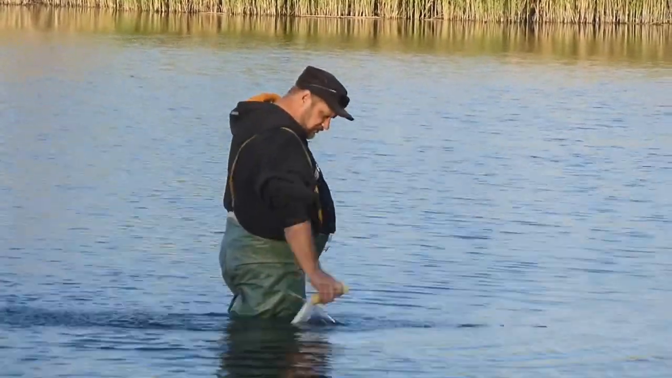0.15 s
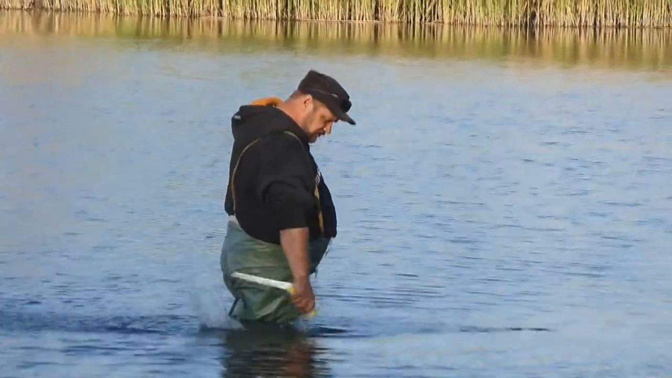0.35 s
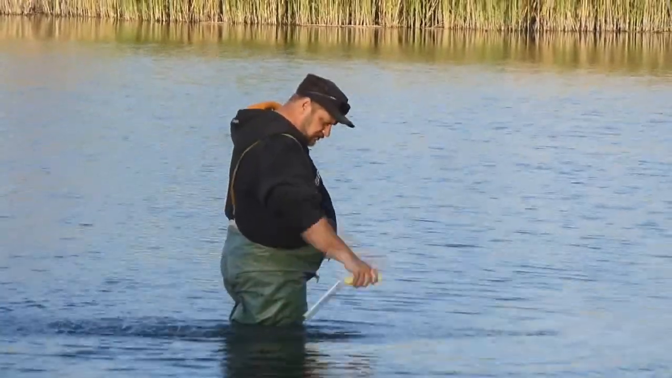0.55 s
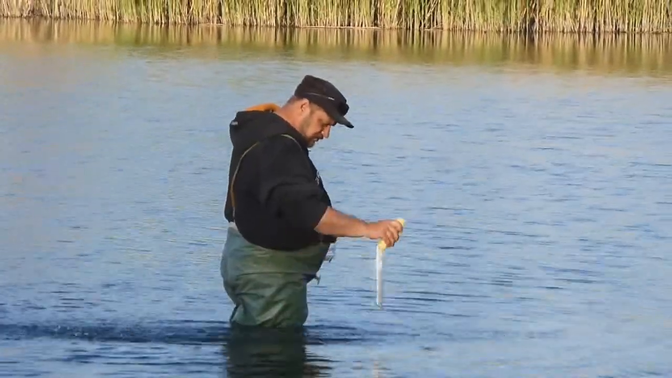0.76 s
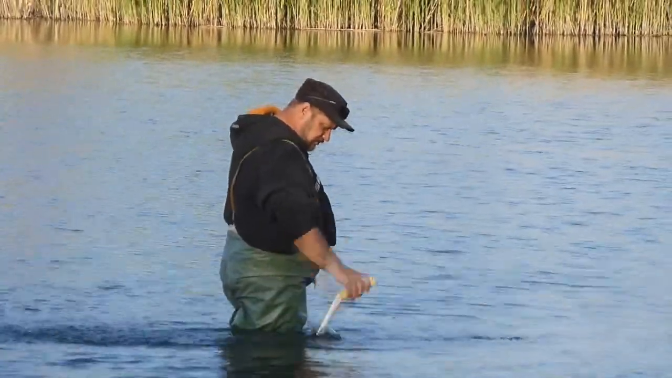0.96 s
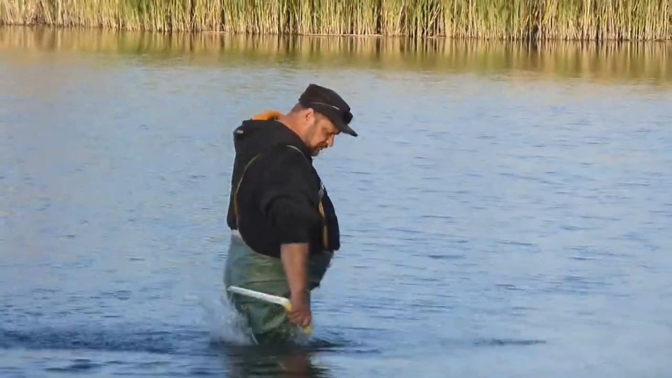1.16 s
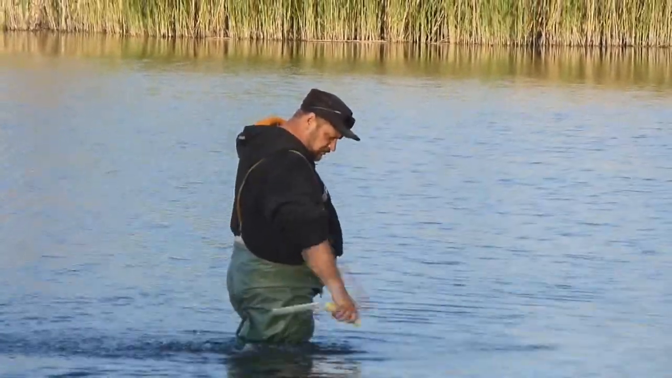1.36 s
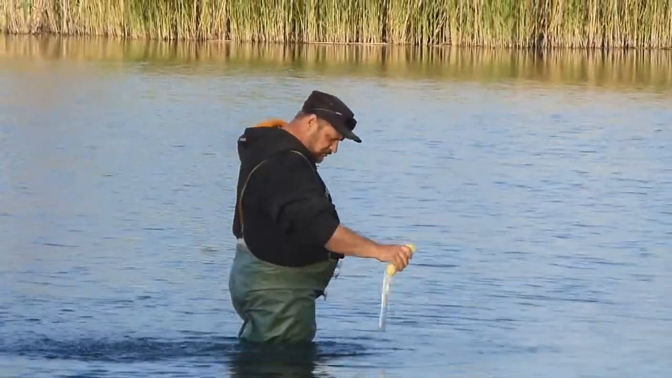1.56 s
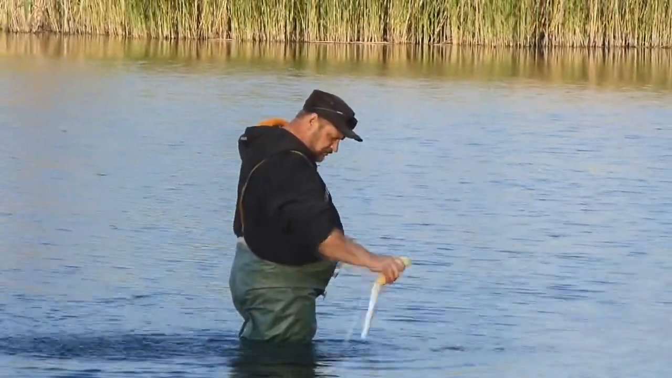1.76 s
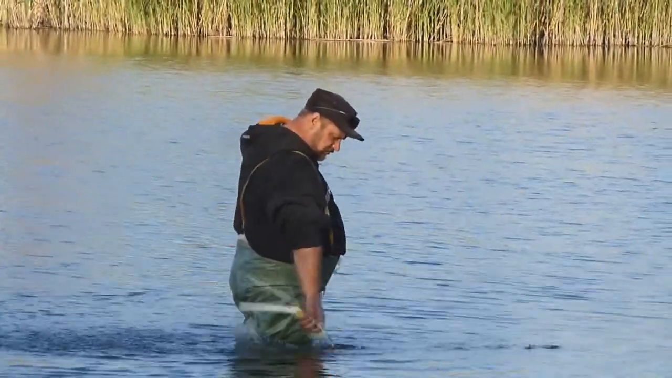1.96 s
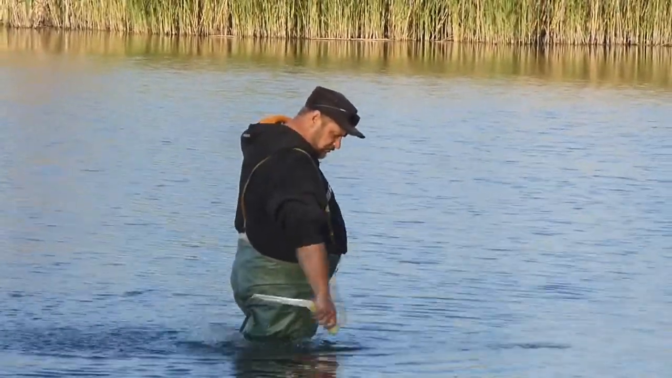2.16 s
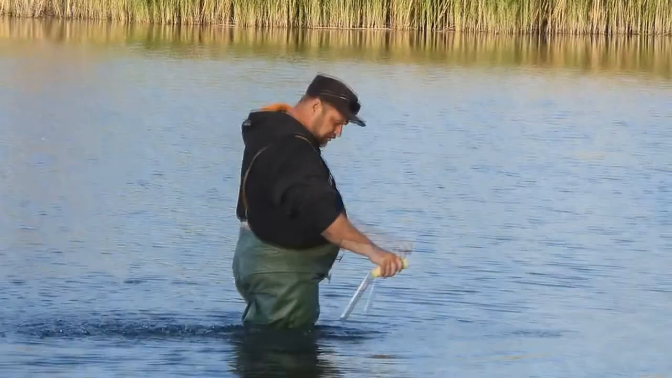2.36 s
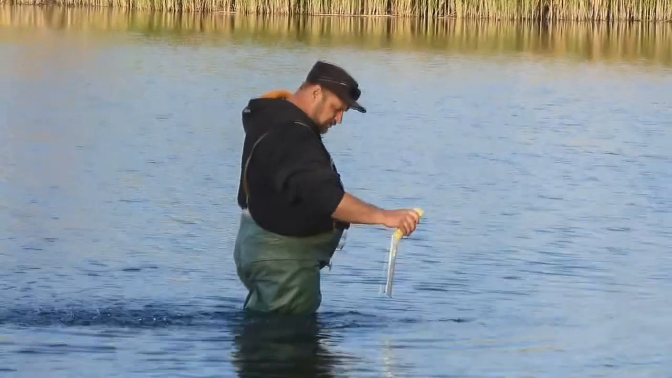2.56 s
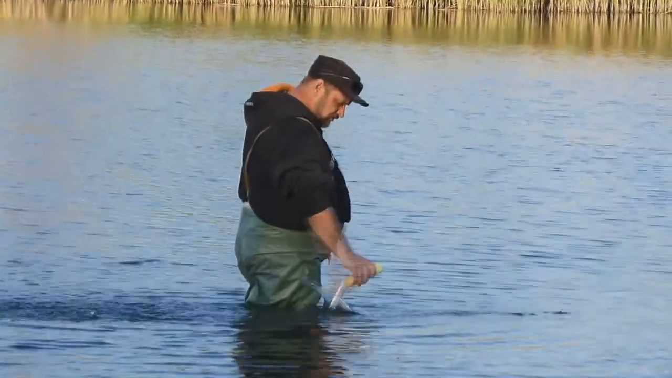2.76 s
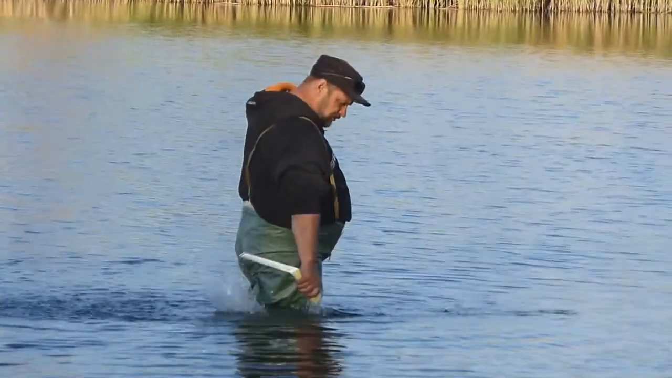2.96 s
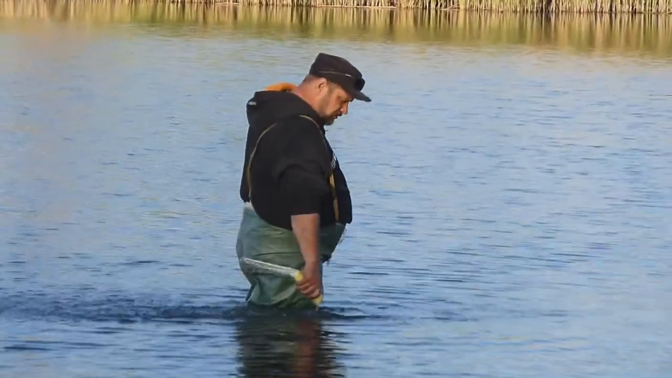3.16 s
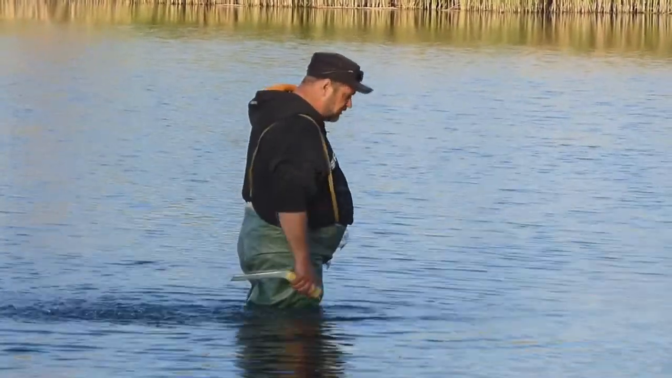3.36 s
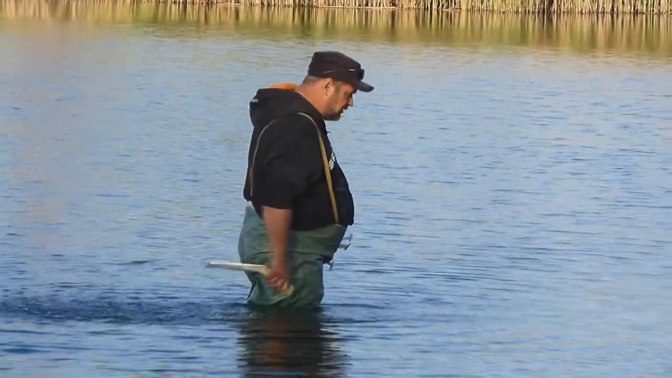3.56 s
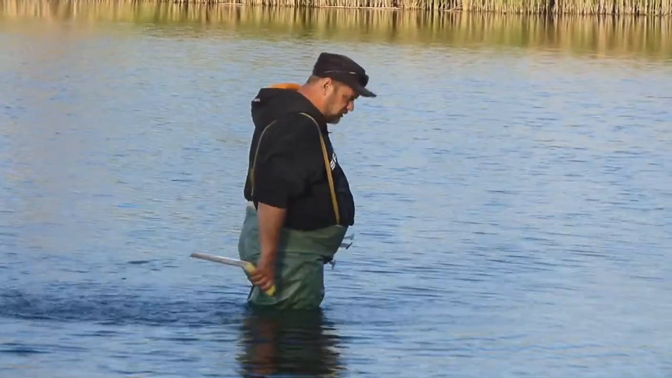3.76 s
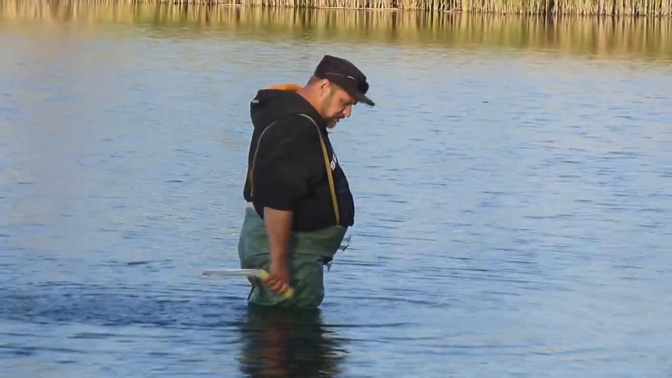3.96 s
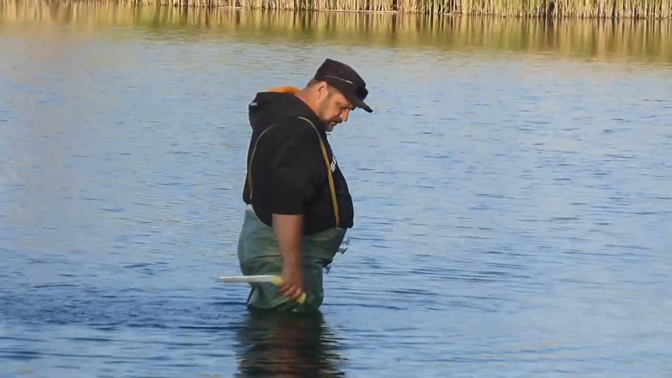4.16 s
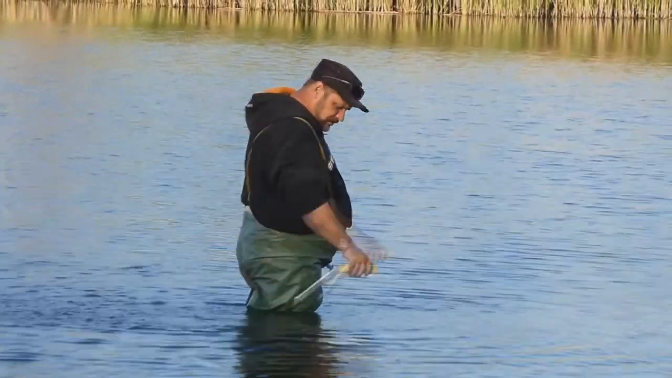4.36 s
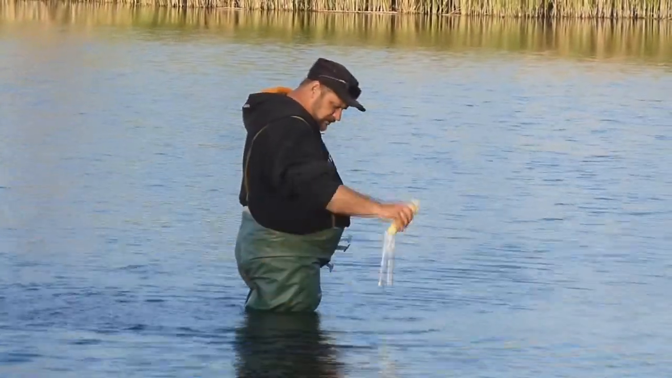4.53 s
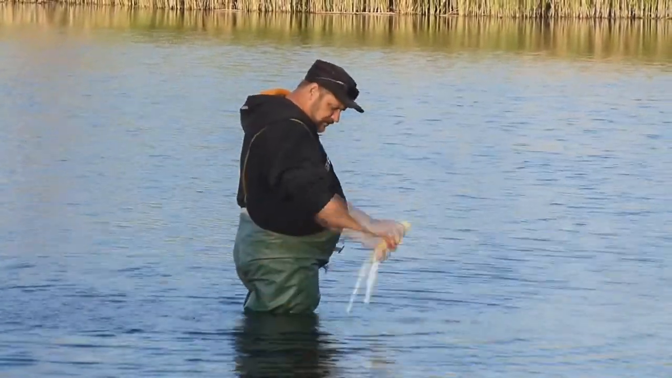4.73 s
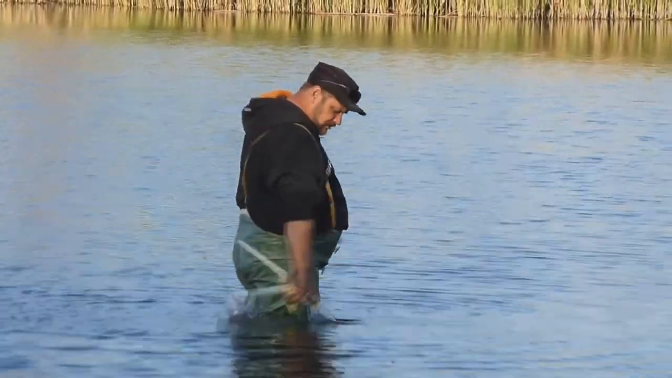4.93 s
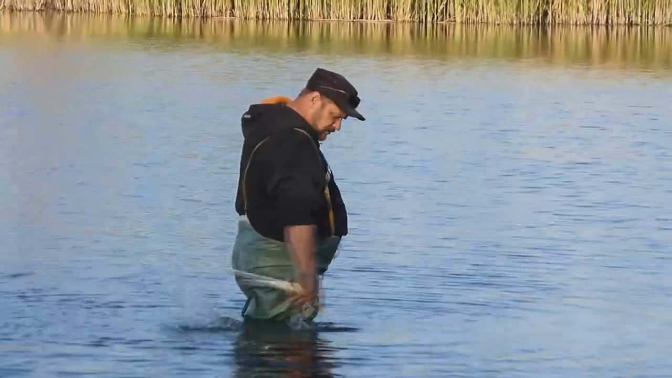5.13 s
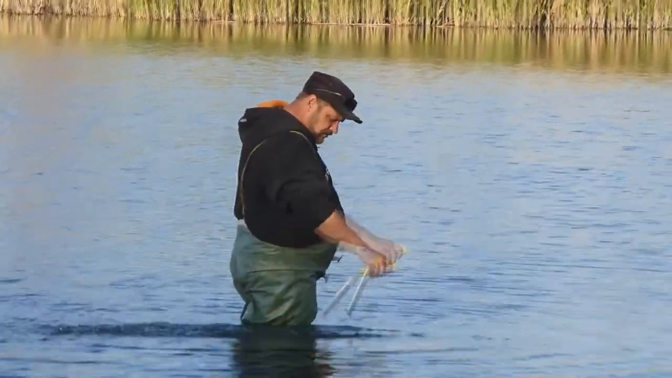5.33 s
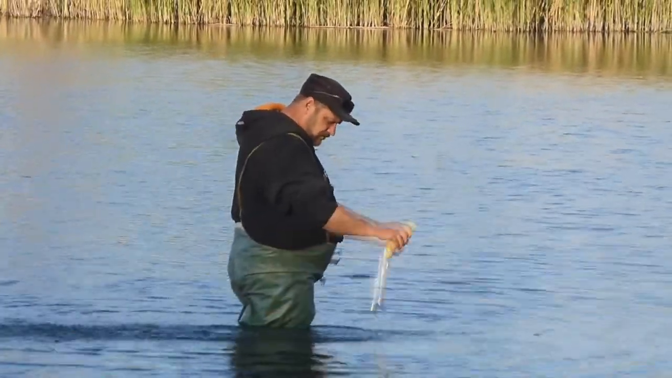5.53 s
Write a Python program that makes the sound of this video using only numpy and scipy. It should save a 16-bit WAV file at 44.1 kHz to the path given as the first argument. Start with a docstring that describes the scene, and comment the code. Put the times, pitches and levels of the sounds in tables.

```python
"""A slap and a low, rising plop break in on faint birdsong: an angler strikes a lake five times with a
wooden clonk. Each stroke drags down an air pocket, which pinches off, throws a little spray and rings
as a bubble resonator, higher as it nears the surface. The reed bank scatters back a faint echo.
Distant birds whistle, trill and yelp over soft air and ripples, and one gust touches the microphone."""
import sys
import numpy as np
from scipy import signal
from scipy.fft import rfft, irfft, next_fast_len
from scipy.io import wavfile
from scipy.ndimage import map_coordinates

SR = 44100
rng = np.random.default_rng(int(sys.argv[2]) if len(sys.argv) > 2 else 0)


def transcribe(signal):
    """Save signal, clipped to [-1, 1], as a 16-bit WAV file at the path in sys.argv[1]."""
    frames = np.atleast_2d(signal).T
    limited = np.clip(frames, -1, 1)
    pcm = np.round(limited * 32767).astype(np.int16)
    wavfile.write(sys.argv[1], SR, pcm)


N = 250929
TIME = np.arange(N) / SR

# strokes of the clonk: pinch-off t/s, time under water before it/s, plop level/dB, first f/Hz,
# last f/Hz, rise time/s, ring re plop/dB, slap level/dB, burst level/dB, spray level/dB, wood level/dB
STROKES = [(0.3170, 0.021, -5.5, 241, 447, 0.0069, -11.5, -30, -33.5, -40, -32),
           (1.1700, 0.011, -3, 223.5, 451, .01, -8, -31, -36, -47.5, -26.5),
           (2.0660, .0201, -6, 221, 420, 0.0081, -9, -33, -38, -41, -30.5),
           (2.944, .0091, -3, 220, 410, .0104, -7, -29, -39, -45.5, -28.5),
           (5.0333, .0215, -3.2, 237, 414, 0.0082, -14.5, -32, -33.3, -44.5, -34)]
# spectra of the surface slap, the closing cavity and the spray: f/Hz, relative level/dB
SLAP_SPECTRUM = [(150, 13), (600, 0), (1200, -4), (2800, -3), (4300, -11), (6000, -24.5), (10000, -31),
                 (15500, -48)]
BURST_SPECTRUM = [(100, -25), (400, -6), (650, 0), (1000, 0), (1600, -2), (3100, -1), (4200, -7),
                  (5500, -14), (9000, -18), (15500, -25)]
SPRAY_SPECTRUM = [(300, -29), (700, -1.5), (1500, 0.5), (3500, -6), (6000, -11), (10000, -21.5),
                  (15500, -32)]
# the clonk's modes, damped by hand and water: f/Hz, relative level/dB, T60/s
WOOD_MODES = [(645, 3, .055), (1020, 3, .035), (1530, -4, .04)]
# air tearing into the pocket: t/s, level/dB
AIR_TEARS = [(0.314, -39), (2.0630, -20)]
# falling drops that trap a bubble: t/s, level/dB, f/Hz
BUBBLE_DROPS = [(0.408, -39, 577), (0.474, -40, 1080), (0.520, -40.5, 1110), (1.208, -34, 556),
                (2.232, -38, 690), (2.243, -39.5, 1020), (2.986, -38, 1110)]
# droplets ticking on the surface: t/s, level/dB
DROPLET_TICKS = [(0.118, -39), (0.812, -39), (0.896, -40), (1.4144, -43), (2.8094, -45), (3.2614, -47),
                 (3.2842, -48), (5.182, -44)]

# slurred whistles: t/s, duration/s, start f/Hz, end f/Hz, level/dB, rasp (0-1)
SLURS = [(-0.03, 0.065, 3750, 3100, -52, .12), (0.782, .12, 2500, 3080, -49, .5),
         (2.498, 0.15, 3400, 4200, -61, .22), (2.616, .091, 4290, 4640, -54, 0.34),
         (3.82, .052, 2790, 3600, -56.5, .3), (4.21, .12, 3620, 3900, -62.5, .15),
         (4.575, .07, 2770, 2850, -53, 0.3), (4.834, 0.16, 2585, 2510, -55, .4),
         (5.07, 0.24, 1860, 1530, -63, .3), (5.341, 0.06, 2200, 1790, -47.5, .35),
         (5.598, 0.064, 2400, 2260, -45.5, 0.2), (5.641, .06, 2320, 1660, -48.5, .3)]
# whistles that rise and fall back: t/s, duration/s, top f/Hz, level/dB
ARCHES = [(0.286, .205, 4380, -58.5), (0.328, .13, 3100, -59), (4.3, .14, 4230, -58.5)]
# quick upward flicks: t/s, level/dB, rasp (0-1)
FLICKS = [(0.533, -56, .7), (4.085, -56.5, 0.88), (4.355, -58, .1), (4.415, -60, .1), (4.94, -61, 1)]
# hoarse notes on one pitch: t/s, duration/s, f/Hz, level/dB
HOARSE_NOTES = [(-0.02, 0.13, 4500, -55), (0.135, 0.18, 2080, -55), (0.627, .05, 4500, -57.5),
                (0.826, .07, 1690, -58.5), (0.878, .052, 2650, -52.5), (1.105, 0.049, 4800, -57.5),
                (1.38, 0.3, 2760, -59.5), (1.436, .19, 2080, -62), (2.62, .09, 2620, -58),
                (2.821, 0.084, 2520, -50.5), (2.95, 0.15, 6450, -62), (4.779, .06, 1994, -56)]
# trills: t/s, duration/s, centre f/Hz, swing/Hz, beat rate/Hz, throb/dB, level/dB, rasp (0-1)
TRILLS = [(5.12, 0.2, 2900, 396, 43, 9, -60, 0.51), (5.394, .15, 1990, 316, 41, 3.5, -52.5, 0.38)]
# held calls: t/s, duration/s, level/dB
HELD_CALLS = [(3.464, 0.081, -49.5), (3.635, .13, -51), (3.53, 0.51, -63.5)]
# double yelps: t/s, level/dB
YELPS = [(3.970, -47), (4.116, -48), (4.291, -47), (4.447, -47)]
# course of one long falling whistle: t/s, f/Hz, level/dB
FALLING_WHISTLE = [(2.72, 8420, -76), (2.81, 8170, -49.5), (2.83, 7320, -48), (2.875, 7090, -49),
                   (2.91, 5880, -52), (2.95, 5070, -56), (3.02, 4540, -55), (3.12, 4220, -62),
                   (3.28, 3200, -51.5)]
# swells of the far chorus: peak t/s, half width/s, level/dB
CHORUS_SWELLS = [(0.1, .3, -58), (0.68, .23, -56.5), (2.32, .18, -56.5), (3.2, .14, -60.5),
                 (5.25, .8, -60.5)]

# reverberation time of the reed bank: f/Hz, T60/s
REED_DECAY = [(100, 1), (330, 0.59), (1000, 0.29), (3000, 0.63), (7000, 0.6), (14000, 0.15)]
# colour of the echoes of water and song: f/Hz, gain/dB
WATER_ECHO_COLOUR = [(100, -36), (220, -42), (340, -26), (550, -22.5), (1500, -33), (8000, -33)]
SONG_ECHO_COLOUR = [(1500, -14), (4000, -15), (7000, -14)]
# puffs of one gust on the microphone: peak t/s, level/dB
GUST_PUFFS = [(4.238, -44), (4.336, -48), (4.46, -55), (4.58, -55), (4.68, -52), (4.83, -56.5)]
# spectra of air and ripples, the far chorus and the gust: f/Hz, relative level/dB
AIR_SPECTRUM = [(15, -61), (25, -17), (133, -1), (193, -2.5), (253, 1), (410, -4.5), (523, -2), (919, -8.5),
                (1080, -7.5), (1800, -9.5), (2850, -11), (3090, -11.5), (3440, -15), (4750, -17),
                (15500, -28.5)]
CHORUS_SPECTRUM = [(1200, -11.5), (2000, -4.5), (2800, 4), (3600, 0.5), (5000, -18), (7000, -15.5),
                   (12000, -41)]
GUST_SPECTRUM = [(20, -12), (40, -7), (65, 2), (110, -6), (170, -18), (400, -50), (1000, -88)]


def amp(db):
    """Amplitude ratio of a level in decibels."""
    return 10 ** (np.asarray(db) / 20)


def unit_rms(x):
    """Normalisation to rms 1."""
    return x / np.sqrt(np.mean(x ** 2) + 1e-20)


def at_frequency(points, hz):
    """Interpolation of (f/Hz, value) points on a logarithmic frequency axis."""
    freqs, values = np.transpose(points)
    return np.interp(np.log(hz + 1), np.log(freqs + 1), values)


def wobble(rate_hz, size=N):
    """Smooth random modulation: a spline through rate_hz Gaussian values a second."""
    knots = rng.standard_normal(int(size * rate_hz / SR) + 4)
    return map_coordinates(knots, [np.arange(size) * rate_hz / SR])


def filtered(x, response):
    """Zero-phase filtering: the spectrum is multiplied by response(f)."""
    size = next_fast_len(len(x) + SR // 4)
    return irfft(rfft(x, size) * response(np.fft.rfftfreq(size, 1 / SR)), size)[:len(x)]


def noise(spectrum, size=N):
    """Spectral shaping of white noise, at rms 1."""
    return unit_rms(filtered(rng.standard_normal(size), lambda hz: amp(at_frequency(spectrum, hz))))


def add(track, start, sound):
    """Superposition of a sound on the track from start/s."""
    at = round(start * SR) + np.arange(len(sound))
    inside = (at >= 0) & (at < N)
    track[at[inside]] += sound[inside]


def sine(hz):
    """A sinusoid whose phase is the integral of its frequency."""
    return np.sin(2 * np.pi * np.cumsum(hz) / SR)


def decay(t, attack, t60):
    """Exponential damping after a quick rise; times in seconds."""
    return (1 - np.exp(-t / attack)) * amp(-60 * t / t60)


def plops():
    """Bubble resonance: the pinched-off pocket throbs, then rings higher as it nears the surface."""
    out, t = np.zeros(N), np.arange(SR // 5) / SR
    for start, _, db, first_hz, last_hz, rise_s, ring_db, *_ in STROKES:
        age = t / rise_s  # a deeper pocket throbs longer and rises later
        hz = first_hz + (last_hz - first_hz) * age ** 4 / (1 + age ** 4)
        throb = .74 * np.exp(-((age - .47) / .37) ** 2) * (1 - np.exp(-t / .0003))
        # the pocket changes shape as it rises, so its ring is uneven
        ring = 2.7 * amp(ring_db + 2.74 * wobble(248, len(t))) * decay(t, attack=.0085, t60=.058)
        add(out, start, amp(db) * (throb + ring) * sine(hz))
    return out


def splashes(push_db=-26.5, push_hz=190, cavity_hz=80):
    """Water entry: the head slaps open a cavity, whose collapse throws spray and excites the wood."""
    out, t = np.zeros(N), np.arange(SR // 4) / SR

    def grainy(spectrum):
        """Random amplitude modulation breaks noise into grains."""
        return unit_rms(noise(spectrum, len(t)) * amp(2.2 * wobble(700, len(t))))

    for pinch, under_s, *_, slap_db, burst_db, spray_db, wood_db in STROKES:
        entry = pinch - under_s
        add(out, entry, 1.8 * amp(slap_db) * decay(t, attack=.0007, t60=.075) * grainy(SLAP_SPECTRUM))
        # water is pushed aside: the cavity sinks in pitch as it deepens and is silent once closed
        cavity = sine(cavity_hz + (push_hz - cavity_hz) * np.exp(-t / .0057))
        still_open = np.clip((under_s + .0066 - t) / .012, 0, 1)
        add(out, entry, amp(push_db) * still_open * decay(t, attack=.0006, t60=.12) * cavity)
        add(out, pinch, 1.8 * amp(burst_db) * decay(t, attack=.0016, t60=.033) * grainy(BURST_SPECTRUM))
        add(out, pinch, 1.27 * amp(spray_db) * decay(t, attack=.0076, t60=.2) * grainy(SPRAY_SPECTRUM))
        for hz, db, t60 in WOOD_MODES:
            loaded_hz = hz * (1 + .054 * wobble(158, len(t)))  # clinging water detunes the wood
            mode = decay(t, attack=.0015, t60=t60) * sine(loaded_hz)
            add(out, pinch, amp(wood_db + db + rng.normal(0, 1)) * mode)
    for start, db in AIR_TEARS:
        inrush = noise([(500, 17), (4000, 9), (9000, 1), (15500, -16)], len(t))
        add(out, start, .73 * amp(db) * decay(t, attack=.0013, t60=.013) * inrush)
    return out


def drops(t60_cycles=34):
    """Air entrainment: some falling drops trap a ringing bubble, others only tick on impact."""
    out, t = np.zeros(N), np.arange(SR // 8) / SR

    def bubble(hz):
        """A damped resonance of rising pitch; smaller, higher bubbles die sooner."""
        rising_hz = hz * (1 + .23 * t * hz / t60_cycles)
        return decay(t, attack=.0013, t60=t60_cycles / hz) * sine(rising_hz)

    for start, db, hz in BUBBLE_DROPS:
        add(out, start, amp(db) * bubble(hz))
    for pinch, *_ in STROKES:  # every stroke leaves a short scatter of tiny bubbles
        for late, small, loud in rng.random(size=(24, 3)):
            start = pinch + .013 + .3 * late ** 2
            add(out, start, amp(-47 + 10 * loud - 16 * late) * bubble(450 * 8 ** small))
    for start, db in DROPLET_TICKS:
        impact = noise([(800, -6), (4000, 0), (8000, -3), (15000, -14)], len(t))
        add(out, start, .6 * amp(db) * decay(t, attack=.0006, t60=.02) * impact)
    return out


def syrinx(hz, rasp, partials_db, buzz_hz=85):
    """A bird's harmonic tone; rasp modulates frequency and amplitude, adding rough sidebands."""
    size = len(hz)
    buzz = sine(buzz_hz * (1 + .145 * wobble(40, size)))
    jitter = .004 * wobble(250, size)
    roughness = rasp ** 2 * (.07 * buzz + .1 * wobble(1100, size))
    hz = hz * (1 + jitter + roughness)
    flutter = amp(2 * wobble(70, size) + rasp * (6 * buzz - 2))
    return flutter * np.sqrt(2) * sum(amp(db) * sine(k * hz) for k, db in enumerate(partials_db, 1))


def note(duration, pitches_hz, rasp, partials_db=(0, -30)):
    """A swelling, fading tone whose frequency contour holds one pitch or passes through two or three."""
    progress = np.linspace(0, 1, max(int(duration * SR), 64))
    contour = np.polyfit(np.linspace(0, 1, len(pitches_hz)), pitches_hz, len(pitches_hz) - 1)
    swell = np.abs(np.sin(np.pi * progress)) ** .55
    return swell * syrinx(np.polyval(contour, progress), rasp, partials_db)


def songbirds(arch_bend_hz_per_s2=110000):
    """Frequency modulation shapes slurs, arches, flicks, hoarse notes and trills from the shore."""
    out = np.zeros(N)
    for start, duration, start_hz, end_hz, db, rasp in SLURS:
        add(out, start, amp(db) * note(duration, [start_hz, end_hz], rasp))
    for start, duration, top_hz, db in ARCHES:
        foot_hz = top_hz - arch_bend_hz_per_s2 * (duration / 2) ** 2
        add(out, start, amp(db) * note(duration, [foot_hz, top_hz, foot_hz], rasp=.3))
    for start, db, rasp in FLICKS:
        add(out, start, amp(db) * note(duration=.038, pitches_hz=[4050, 4910, 5550], rasp=rasp))
    for start, duration, hz, db in HOARSE_NOTES:
        add(out, start, amp(db) * note(duration, [hz], rasp=.764))
    for start, duration, hz, swing_hz, beat_hz, throb_db, db, rasp in TRILLS:
        t = np.arange(int(duration * SR)) / SR
        beat = -np.cos(2 * np.pi * beat_hz * t)  # loudest at the top of each swing
        swell = np.sqrt(np.abs(np.sin(np.pi * t / duration)))
        tone = syrinx(hz + swing_hz * beat, rasp, partials_db=[0])
        add(out, start, amp(db + 2 + throb_db * beat) * swell * tone)
    return out


def harmonic_calls(held_hz=1584, yelp_hz=(1205, 1268, 1020), second_yelp_delay_s=.059):
    """A bird holds one pitch, then yelps in pairs; the second harmonic dominates both calls."""
    out = np.zeros(N)
    for start, duration, db in HELD_CALLS:
        add(out, start, amp(db) * note(duration, [held_hz], rasp=.16, partials_db=[-7, 1, -28]))

    def yelp(duration):
        """A harmonic series with a hoarse partial halfway between its first two members."""
        harmonics = note(duration, yelp_hz, rasp=.45, partials_db=[-10, .5, -24])
        halfway = note(duration, np.multiply(yelp_hz, 1.5), rasp=.97, partials_db=[0])
        return harmonics + amp(-12) * halfway

    for start, db in YELPS:
        add(out, start, amp(db) * yelp(duration=.0364))
        add(out, start + second_yelp_delay_s, amp(db - 1) * yelp(duration=.029))
    return out


def falling_whistle(fray_start_s=3.07, fray_s=.09, release_s=.09):
    """A long downward frequency sweep frays into a buzz as its modulation deepens."""
    times, pitches_hz, levels_db = np.transpose(FALLING_WHISTLE)
    hz = np.interp(TIME, times, pitches_hz)
    db = np.interp(TIME, times, levels_db)
    rasp = .12 + .55 * np.clip((TIME - fray_start_s) / fray_s, 0, 1)
    singing = (TIME > times[0]) * np.clip(1 - (TIME - times[-1]) / release_s, 0, 1)
    return singing * amp(db) * syrinx(hz, rasp, partials_db=[0, -28])


def twitter(count=20, low_hz=2600, high_hz=4700):
    """Faint chirps along the shore: a random process whose rate follows the chorus envelope."""
    out, activity = np.zeros(N), np.cumsum(chorus_envelope())
    for k, (when, high, slope, loud) in enumerate(rng.random(size=(count, 4))):
        start = np.interp((k + when) / count, activity / activity[-1], TIME)
        hz = low_hz * (high_hz / low_hz) ** high
        slur = .099 * (2 * slope - 1)
        chirp = note(duration=.08, pitches_hz=[hz * (1 - slur), hz * (1 + slur)], rasp=.56)
        add(out, start, amp(-64 + 2.5 * (2 * loud - 1)) * chirp)
    return out


def reed_echo(x, colour, build_s):
    """Diffuse scattering: echoes from the reeds build up, then decay at a rate set by frequency."""
    hz, t, spectra = signal.stft(rng.standard_normal(SR), SR, nperseg=256)
    envelope = decay(t, attack=build_s, t60=at_frequency(REED_DECAY, hz)[:, None])
    tail = signal.istft(spectra * envelope, SR, nperseg=256)[1]
    echo = signal.fftconvolve(x, unit_rms(tail) / np.sqrt(len(tail)))[:N]
    return filtered(echo, lambda f: amp(at_frequency(colour, f)))


def gust(rise_db_per_s=108, fall_db_per_s=200):
    """Turbulent pressure on the microphone: a low rumble that follows the strongest puff."""
    puffs_db = [db - np.maximum(rise_db_per_s * (peak - TIME), fall_db_per_s * (TIME - peak))
                for peak, db in GUST_PUFFS]
    return amp(np.max(puffs_db, axis=0) + 1.1 * wobble(20)) * noise(GUST_SPECTRUM)


def chorus_envelope(rest_db=-71.5):
    """Amplitude envelope of the far birds: Gaussian swells above a resting level."""
    swells = sum(amp(db) * np.exp(-((TIME - peak) / width) ** 2) for peak, width, db in CHORUS_SWELLS)
    return amp(rest_db) + swells


def far_chorus():
    """Incoherent summation: many far birds blur into a band of noise."""
    return chorus_envelope() * amp(1.5 * wobble(14)) * noise(CHORUS_SPECTRUM)


def air_and_ripples(db=-54):
    """Ambient noise of air and ripples: broadband, gently wavering in level."""
    return amp(db + 1.15 * wobble(6.5)) * noise(AIR_SPECTRUM)


def scene(dipole_hz=50):
    """Superposition of near water sounds, far birds, their echoes and the quiet lake."""
    # dipole radiation: sources just under the surface give almost no deep bass
    water = filtered(plops() + splashes() + drops(), lambda hz: hz ** 4 / (hz ** 4 + dipole_hz ** 4))
    song = songbirds() + harmonic_calls() + falling_whistle() + twitter()
    water_echo = amp(-1.1) * reed_echo(water, WATER_ECHO_COLOUR, build_s=.094)
    song_echo = reed_echo(song, SONG_ECHO_COLOUR, build_s=.012)
    background = air_and_ripples() + far_chorus() + gust()
    return (water + water_echo + song + song_echo + background)[None]


def record(dry):
    """Band limiting: an ideal low-pass filter passes nothing above 15.7 kHz."""
    return filtered(dry[0], lambda hz: hz < 15700)[None]


dry = scene()
out = record(dry)
transcribe(out)
```